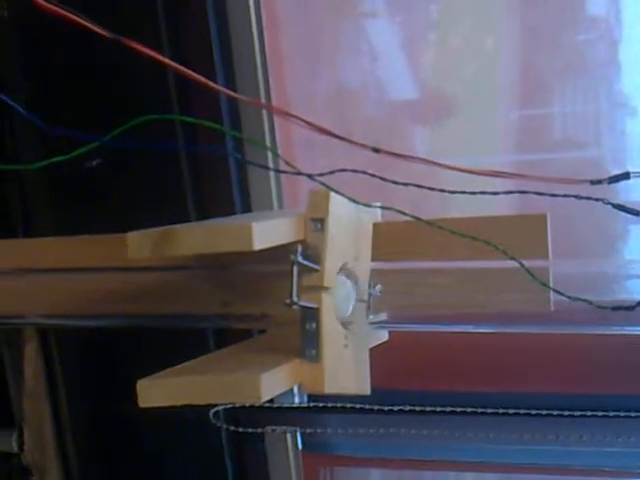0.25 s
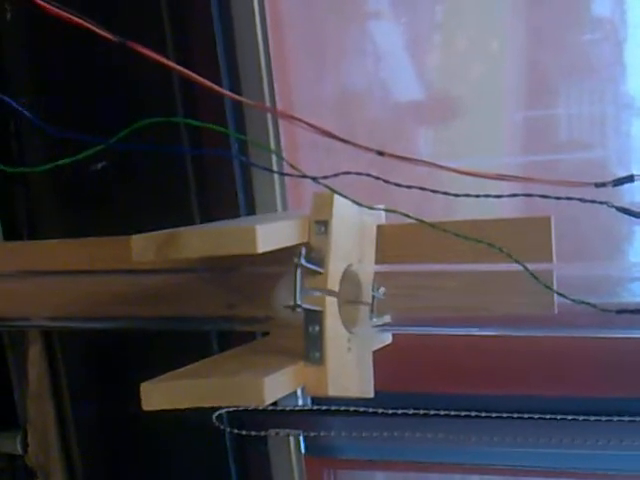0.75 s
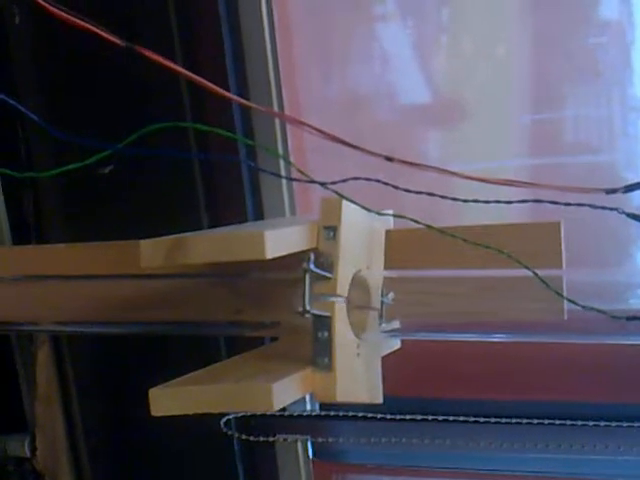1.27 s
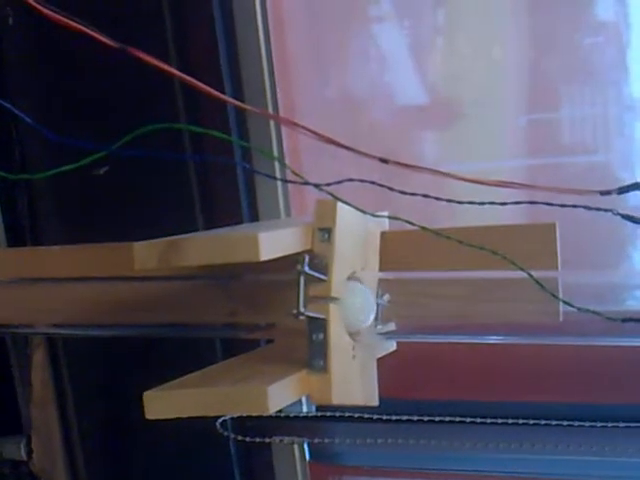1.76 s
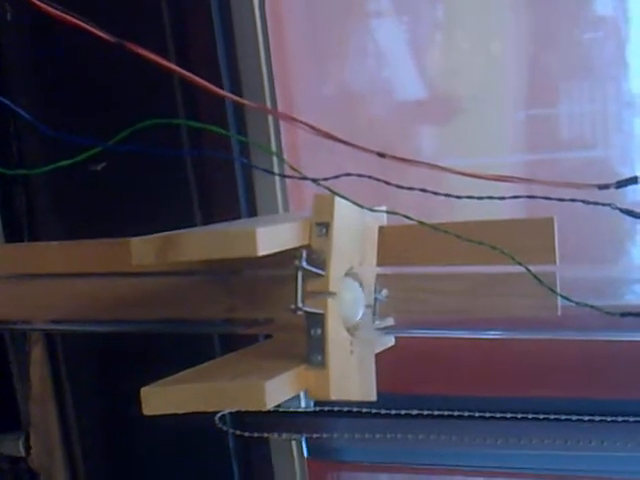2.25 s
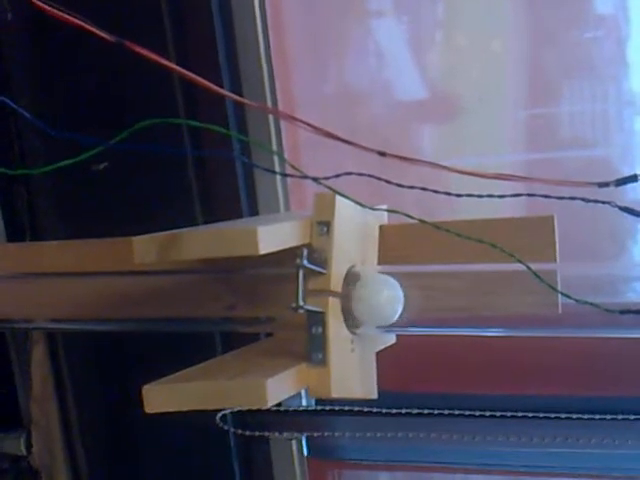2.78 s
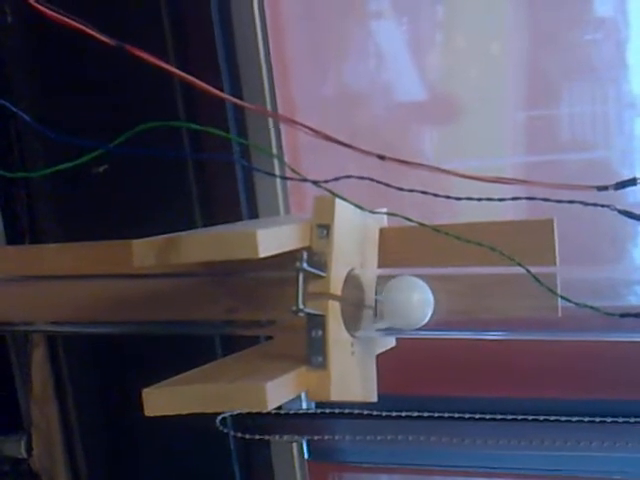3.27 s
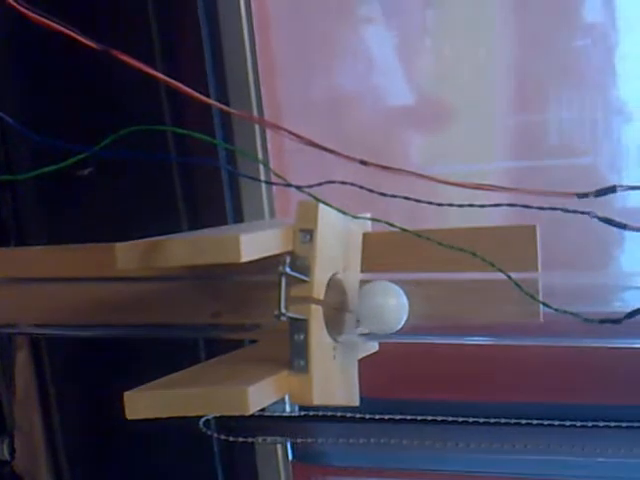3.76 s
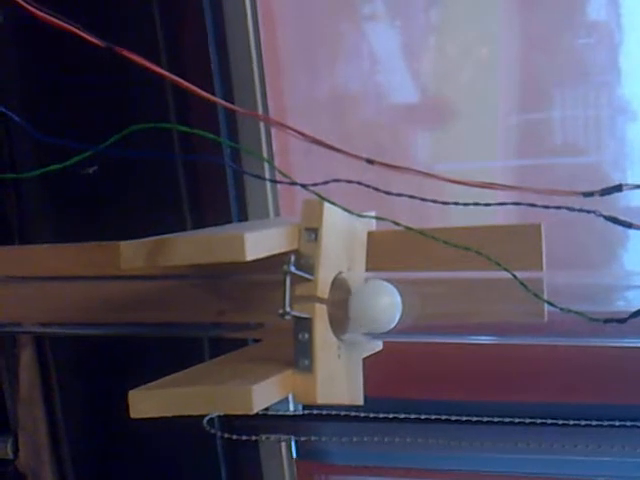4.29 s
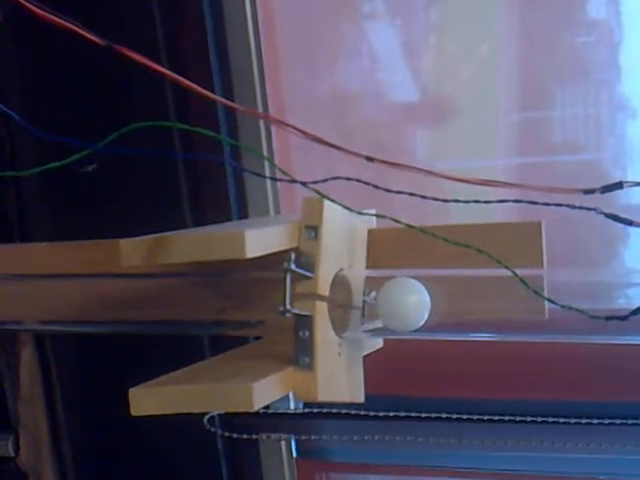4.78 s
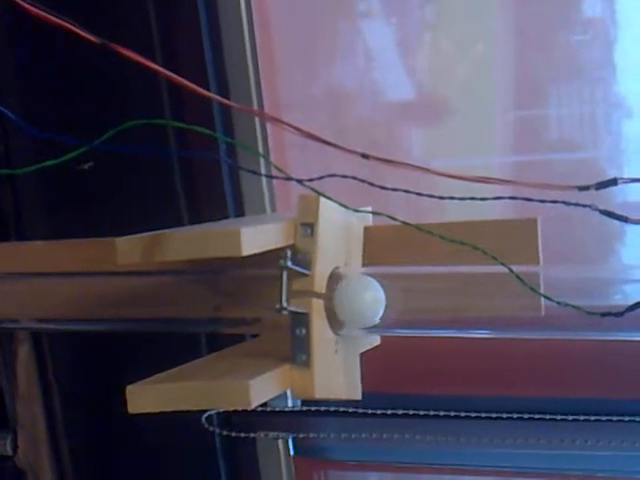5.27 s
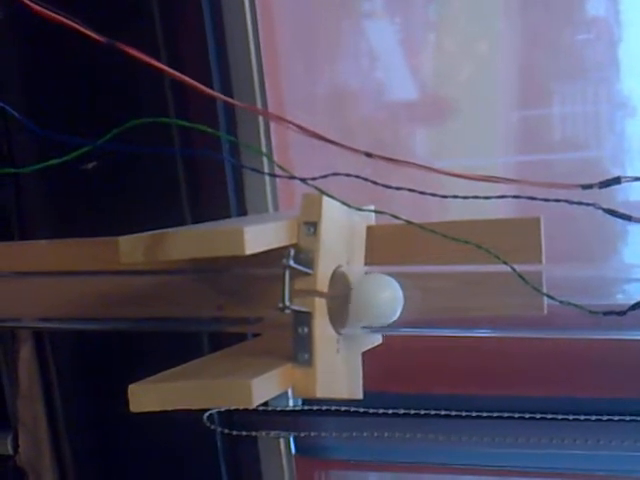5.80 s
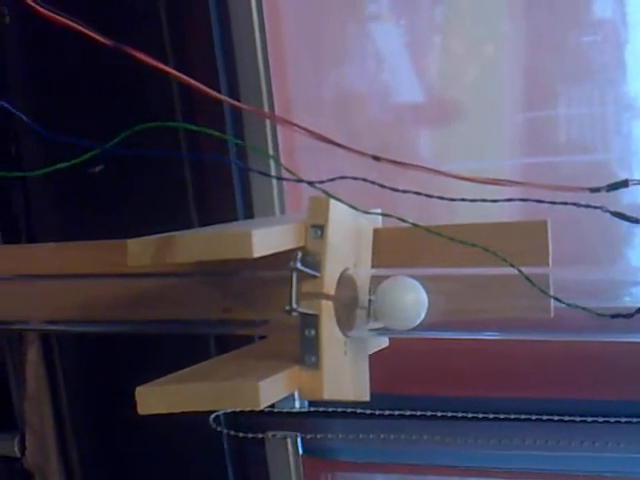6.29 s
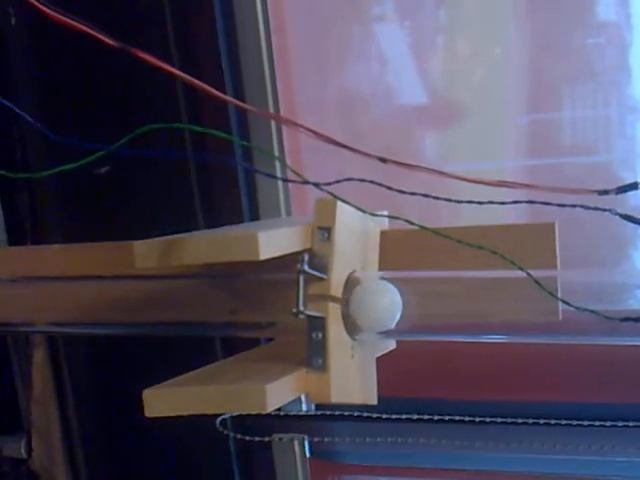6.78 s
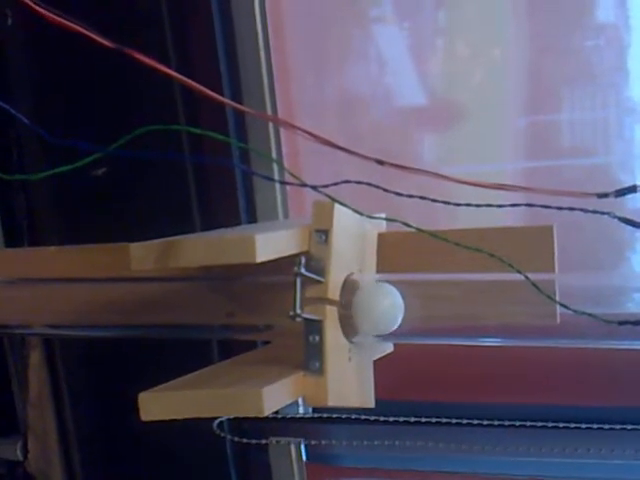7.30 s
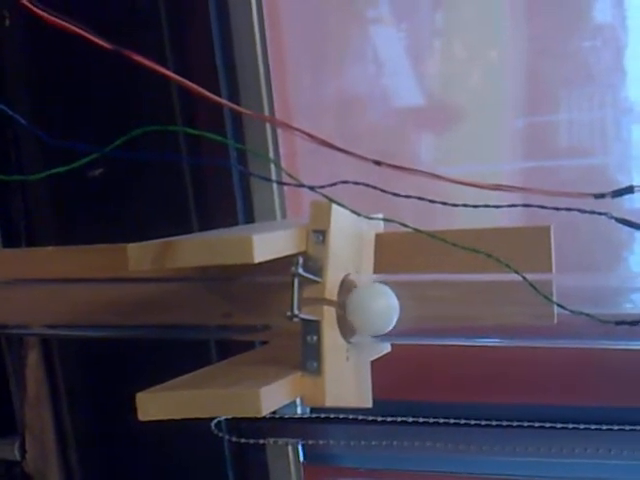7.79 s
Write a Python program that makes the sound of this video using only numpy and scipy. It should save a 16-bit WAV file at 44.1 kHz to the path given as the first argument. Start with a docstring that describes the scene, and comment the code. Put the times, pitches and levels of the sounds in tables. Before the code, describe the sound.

In a hard indoor room, heard at some distance, a small ball rattles irregularly against wood at the end of a tube. Knocks are short, boxy and mid-toned, each leaving a brief reverberant tail. A tight cluster peaks in one very loud clack before the middle; later come spaced knocks, then a run of weak taps. Faint rolling, steady hiss and low hum lie beneath.

```python
"""In a hard room, some way off, a light ball knocks irregularly on a wooden end stop inside a clear tube.
Each blow is a burst of noise echoes, coloured by its contact, that swells briefly and dies in the room.
Between blows the ball rolls softly: noise that gathers before each blow and fades after it.
Both pass through the resonances of tube and frame; four faint pings, a low tone, hiss and hum join them."""
import sys
import numpy as np
from scipy import signal
from scipy.fft import rfft, irfft
from scipy.io import wavfile

SR = 44100
rng = np.random.default_rng(int(sys.argv[2]) if len(sys.argv) > 2 else 0)


def dump(signal):
    """Clip the signal to [-1, 1] and save it as 16-bit WAV at the path in sys.argv[1]."""
    limited = np.clip(np.atleast_2d(signal).T, -1, 1)
    pcm = np.round(limited * 32767).astype(np.int16)
    wavfile.write(sys.argv[1], SR, pcm)


N = 355005

# blows of the ball, with levels before contact, swell and resonances: (time [s], level [dB],
# thump up to 190 Hz [dB], wooden body at 300 to 430 Hz [dB], brightness, mostly from 9 kHz up [dB])
BLOWS = [(0.226,-30.5,-7.5,0.5,2.5), (0.358,-38,-8,1,-14), (1.22,-62,0,-5,9), (1.35,-26,0.5,-0.5,1.5),
         (2.095,-53.5,10,8,2), (2.176,-38,7,2,-12), (2.27,-39,-1,3,-1), (2.294,-41,0,-18,-11),
         (2.764,-46.5,0,3,-9), (2.895,-43,-3,1.5,-8), (3.042,-51.5,-8,-8,-12), (3.143,-41,0,-4,-11),
         (3.24,-33.5,2,2,-1), (3.268,-30,-12,-3.5,-9), (3.398,-15.5,-6,-14,-13), (3.42,-10.5,-15,-1.5,-4),
         (3.429,-9.5,-7,0,-5.5), (3.56,-21,-3,3.5,0), (4.053,-41,-13,0,-4), (4.075,-38.5,0,1.5,0.5),
         (4.29,-47.5,0,5.5,-2), (4.409,-22.5,-6.5,-3,-0.5), (4.96,-36.5,-3.5,-1.5,-5),
         (5.266,-42.5,-4,3,4.5), (5.408,-38.5,-4,2.5,1), (5.62,-42.5,-2,0.5,0), (5.768,-20.5,-4.5,1.5,2),
         (6.167,-23,-6,4.5,2.5), (6.684,-45,-12,3.5,-0.5), (6.775,-36,-4,2,1.5), (6.854,-36.5,-7,2.5,1.5),
         (6.945,-42.5,0,3.5,-1), (7.071,-42,-1.5,-1,6), (7.272,-47.5,0,3,-4), (7.449,-56.5,-3,-1,5),
         (7.671,-47,-2,-10,1.5), (7.711,-48.5,-8,6.5,3)]
# broad colour of a middling blow, shared by the rolling: (frequency [Hz], relative density [dB per Hz])
BLOW_COLOUR = [(25, -12.5), (70, -4.5), (130, -4.5), (240, -3.5), (360, -3.5), (520, -3.5), (750, -1.5),
               (1300, -0.5), (1950, 1), (2700, -6.5), (4800, -12.5), (7000, -17), (10000, -24.5),
               (15500, -38.5)]
HARD_DB = -27.5  # blows above this level count as hard


def amp(db):
    """Decibels to gain."""
    return 10 ** (np.asarray(db) / 20)


def unit(x):
    """Scales to an rms of one."""
    return x / np.sqrt(np.mean(x ** 2) + 1e-20)


def read(points, hz):
    """Reads a table on a logarithmic frequency axis."""
    f, value = np.transpose(points)
    return np.interp(np.log(hz + 1), np.log(f + 1), value)


def add(mix, start_s, sound):
    """Mixes a sound in at a start time, cut off at the end of the mix."""
    part = mix[round(start_s * SR):][:len(sound)]
    part += sound[:len(part)]


def coloured(x, points):
    """Filters x by a smooth spectrum."""
    hz = np.fft.rfftfreq(len(x), 1 / SR)
    return irfft(rfft(x) * amp(read(points, hz)), len(x))


def drift(rate_hz):
    """Slow random wandering with an rms of one: noise low-passed near rate_hz."""
    hz = np.fft.rfftfreq(N, 1 / SR)
    spectrum = rfft(rng.standard_normal(N))
    return unit(irfft(spectrum / (1 + (hz / rate_hz) ** 4), N))


def knocks(early_db=1.0, early_s=0.15, abrupt=0.62):
    """Every blow takes partly the same paths through the room; its contact sets how dull or sharp it is."""
    out, t = np.zeros(N), np.arange(SR) / SR
    alike = 0.15  # share of echo power common to all blows
    shared = rng.standard_normal(SR)
    for start_s, db, *answer_db in BLOWS:
        own = rng.standard_normal(SR)
        paths = np.sqrt(alike) * shared + np.sqrt(1 - alike) * own
        # the first echoes are uneven: a few strong ones stand out before they blend
        spread = np.log(amp(early_db)) * np.exp(-t / early_s)
        uneven = np.repeat(rng.standard_normal(SR), 30)[:SR]  # one draw holds for 30 samples
        paths *= np.exp(spread * uneven - spread ** 2)
        paths = coloured(paths, spot(spread_db=2, spacing_hz=70))
        middling = unit(coloured(paths, BLOW_COLOUR))
        echoes = coloured(middling, contact(db, *answer_db))
        # the hardest blows are the most abrupt: they leave a smaller share in the tail
        tail_db = -abrupt * max(db - HARD_DB, 0) * (1 - np.exp(-t / 0.07))
        blow = reverberate(echoes, swell_s=0.011, near_db=11.5, near_s=0.0073)
        add(out, start_s, amp(db + tail_db) * blow)
    return out


def contact(db, thump_db, body_db, bright_db):
    """How hard, where and how sharply the ball lands decides which parts answer: (Hz, dB)."""
    ring_db = 1 + 0.27 * max(db - HARD_DB, 0)  # hard blows ring more near 2 and 5 kHz
    crack_db = max(bright_db + 0.5, 0)  # blows brighter than -0.5 dB crack near 5 kHz
    wood = [(190, thump_db), (300, body_db), (430, body_db), (600, 0), (1550, 0)]
    ring = [(1850, ring_db), (2100, ring_db),
            (2600, (ring_db + bright_db + crack_db) / 4),
            (5000, 0.7 * ring_db + 0.3 * bright_db + crack_db)]
    treble = [(9000, bright_db), (13000, 1.4 * bright_db)]
    return wood + ring + treble


def spot(spread_db, spacing_hz):
    """Each spot on the wood favours its own short resonances, drawn at random: (Hz, dB)."""
    hz = np.arange(500, 16000, spacing_hz)
    return [(400, 0), *zip(hz, spread_db * rng.standard_normal(len(hz)))]


def reverberate(echoes, swell_s, near_db, near_s):
    """Echoes pile up after a blow; strong near ones pass quickly, then each band dies at its own rate."""
    # decay of the room: (frequency [Hz], time to fall by 60 dB [s])
    room_decay = [(100, 0.87), (350, 0.48), (1200, 0.51), (2200, 0.48), (5000, 0.43), (9000, 0.35),
                  (15000, 0.49)]
    hz, t, bands = signal.stft(echoes, SR, nperseg=512, noverlap=384)
    bands = bands * amp(-60 * t / read(room_decay, hz)[:, None])
    tail = signal.istft(bands, SR, nperseg=512, noverlap=384)[1][:len(echoes)]
    age = np.arange(len(tail)) / SR
    swell = (1 - np.exp(-age / swell_s)) ** 2
    near = amp(near_db * np.exp(-age / near_s))
    return tail * swell * near


def rolling(approach_db=-5):
    """The ball rubs the wall unevenly and stirs the same colour as a blow; it is quieter on the way in."""
    middling_db, db_per_db = -54.5, 0.1737  # roll after a blow at HARD_DB; its rise with blow level
    free_s, held_db = 2.0, -1.5  # until free_s the ball sits in the hole of the stop and rolls quieter
    slow_db_per_s = 20  # the ball rolls on after each blow and slows
    t, effort_db = np.arange(N) / SR, -np.inf
    for blow_s, db, *_, bright_db in BLOWS:
        top_db = middling_db + db_per_db * (db - HARD_DB) + held_db * (blow_s < free_s)
        # a dull blow ends a gathering roll, a bright one comes out of a hop: a steeper rise
        gather_db_per_s = 296 * amp(1.6 * bright_db)
        before_db = approach_db - gather_db_per_s * (blow_s - t)
        after_db = -slow_db_per_s * (t - blow_s)
        shape_db = np.where(t < blow_s, before_db, after_db)
        effort_db = np.maximum(effort_db, top_db + shape_db)
    bumps_db = 1.8 * drift(16)
    rub = unit(coloured(rng.standard_normal(N), BLOW_COLOUR))
    return rub * amp(effort_db + bumps_db)


def tube(x, width_hz, loss):
    """The modes of tube and frame ring on beside the sound that drives them; higher modes are wider."""
    # resonances, and dips between them: (frequency [Hz], gain of this filter alone at its centre [dB])
    modes = [(68, -8), (110, 6), (137, 6.5), (168, -29), (207, 5.5), (235, -11), (345, 7.5), (370, 5.5),
             (391, 6.5), (520, 2), (640, 4.5), (670, 1), (877, 5), (964, 3.5), (991, 1), (1038, 5.5),
             (1324, 5), (1480, 6.5), (1527, 3.5), (1593, 2.5), (1671, 1), (1749, 1), (1880, -5),
             (1916, 0.5), (1974, 4), (2111, -18), (2242, 3.5), (2666, 4.5), (2790, -19), (2947, 2)]
    out = x.copy()
    for hz, db in modes:
        b, a = signal.iirpeak(hz, hz / (width_hz + loss * hz), SR)
        out += (amp(db) - 1) * signal.lfilter(b, a, x)
    return out


def pings(fade_s=0.0016):
    """Four very short, faint pings near 2 kHz, around 2.2 to 2.3 s: sines that peak after fade_s and fade."""
    # (time [s], peak level [dB], pitch [Hz])
    ping_table = [(2.205, -41, 2000), (2.2224, -36, 1980), (2.297, -34, 1960), (2.301, -36, 1900)]
    out, t = np.zeros(N), np.arange(SR // 20) / SR
    for start_s, db, hz in ping_table:
        envelope = t / fade_s * np.exp(1 - t / fade_s)
        add(out, start_s, amp(db) * envelope * np.sin(2 * np.pi * hz * t))
    return out


def low_tone(waver=0.73):
    """A faint low sine swells once under a half-cosine arch; its phase wavers by waver radians rms."""
    loudest_s, length_s = 2.46, 0.31
    tone_hz, loudest_db = 193.4, -58  # rms level at the top of the arch
    t = np.arange(N) / SR
    arch = np.cos(np.pi * np.clip((t - loudest_s) / length_s, -0.5, 0.5))
    tone = np.sqrt(2) * np.sin(2 * np.pi * tone_hz * t + waver * drift(13))
    return amp(loudest_db) * arch * tone


def background(hiss_db=-59, hum_db=-1, flutter_db=0.93):
    """Soft noise hiss, fluttering slightly in level, with faint hum lines whose phases waver."""
    # hiss spectrum: (frequency [Hz], relative density [dB per Hz])
    hiss_colour = [(20, 6), (50, -9), (72, 0), (105, 2.5), (210, -0.5), (245, -5), (330, -4), (520, -9.5),
                   (900, -5), (2200, -5.5), (2650, -16), (4200, -17.5), (6000, -27.5), (15500, -23.5)]
    # hum lines: (frequency [Hz], rms level before hum_db is added [dB])
    hum_lines = [(48.4, -69), (140, -68.5), (283, -71), (334, -68), (414.5, -73.5), (942, -105),
                 (1550, -73), (1992, -84), (2121, -72)]
    t = np.arange(N) / SR
    hiss = unit(coloured(rng.standard_normal(N), hiss_colour)) * amp(flutter_db * drift(4.9))
    hum = np.zeros(N)
    for hz, db in hum_lines:
        hum += amp(db) * np.sqrt(2) * np.sin(2 * np.pi * hz * t + 0.7 * drift(4))
    return amp(hiss_db) * hiss + amp(hum_db) * hum


def scene():
    """Blows and rolling sound through the tube; pings, a low tone and the background join them."""
    ball = tube(knocks() + rolling(), width_hz=14, loss=0.001)
    return (ball + pings() + low_tone() + background())[None]


def record(dry):
    """The recorder's band limit: a steep low-pass at 15.74 kHz."""
    lowpass = signal.firwin(801, 15740, window=("kaiser", 9), fs=SR)
    return signal.oaconvolve(dry, lowpass[None], "same")


dry = scene()
out = record(dry)
dump(out)
```